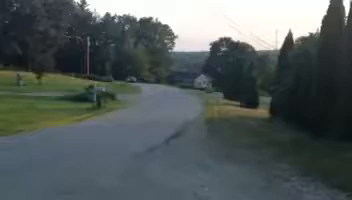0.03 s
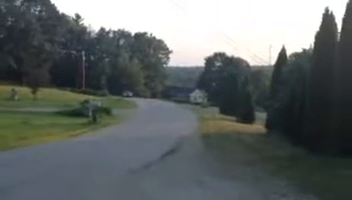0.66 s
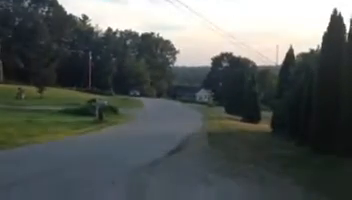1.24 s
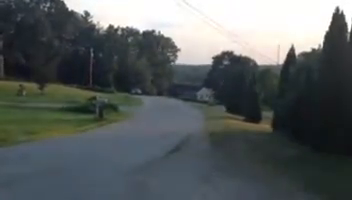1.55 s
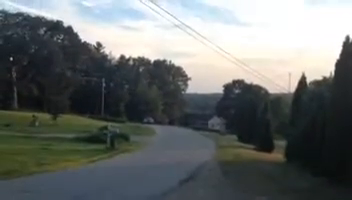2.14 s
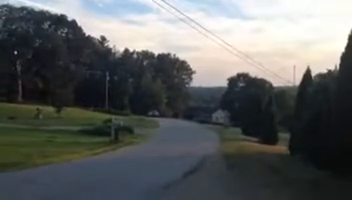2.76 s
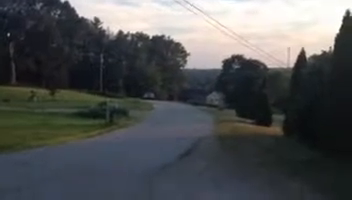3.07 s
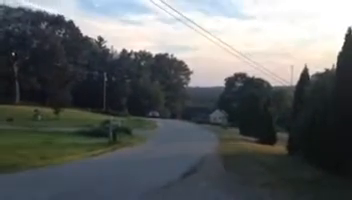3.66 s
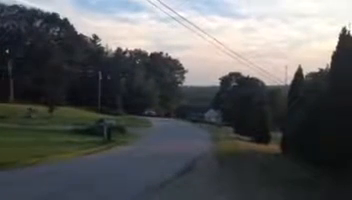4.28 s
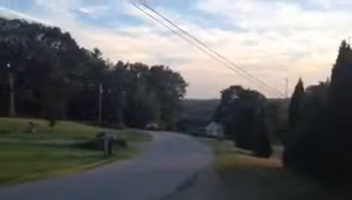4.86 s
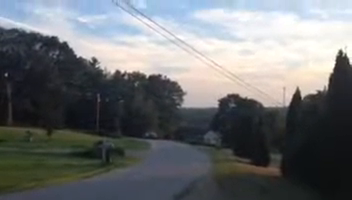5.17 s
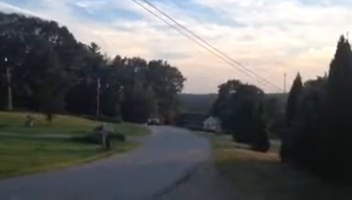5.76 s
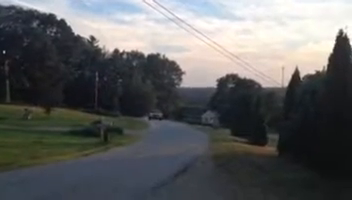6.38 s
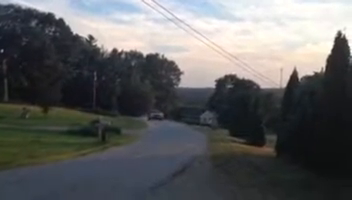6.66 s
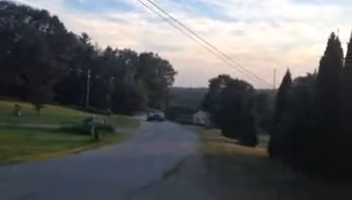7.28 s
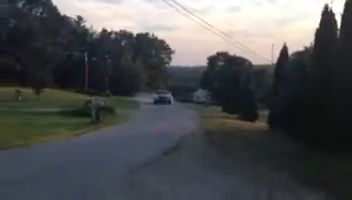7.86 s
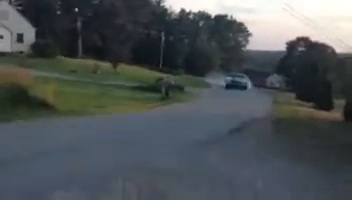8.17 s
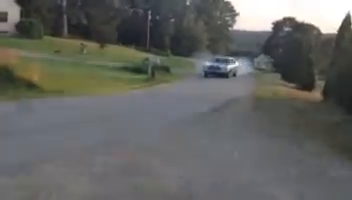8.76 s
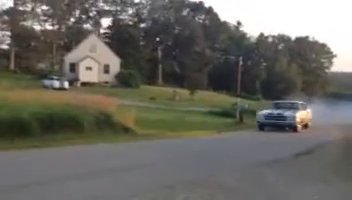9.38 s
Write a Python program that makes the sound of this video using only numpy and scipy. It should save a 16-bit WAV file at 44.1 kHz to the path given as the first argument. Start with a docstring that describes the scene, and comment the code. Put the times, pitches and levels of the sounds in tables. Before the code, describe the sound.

A faint V8 idle on a country road surges into a loud approaching burnout, tyres squealing, then drops to a thumping lope.

```python
"""A V8 lopes at idle far down a country road, in still air with a faint bird and an insect calling.
It blips, then spins its rear tyres in a long burnout towards a hand-held mono microphone, whose case
ticks now and then. Firing pulses ring the pipes into a boom, bark and drone; the slipping rubber roars,
squeals and whines, with a dull echo off the tree line. Close by, unburnt fuel pops as the driver
lifts, the tyres grip and the engine falls back to a thumping lope."""
import sys
import numpy as np
from scipy import signal
from scipy.fft import rfft, irfft, next_fast_len
from scipy.io import wavfile
from scipy.ndimage import uniform_filter1d, map_coordinates

SR = 44100
rng = np.random.default_rng(int(sys.argv[2]) if len(sys.argv) > 2 else 0)


def transcribe(u):
    """Save the signal u as a 16-bit wav file named by the first command-line argument.

    u: samples, shape (n,) or (channels, n), limited to [-1, 1]; the rate is SR.
    q: integer samples, one column per channel.
    """
    v = np.clip(np.atleast_2d(u).T, -1, 1)
    q = np.round(v * 32767).astype(np.int16)
    wavfile.write(sys.argv[1], SR, q)


N = 419832

# Idle, blip, burnout and overrun. Each row: time in seconds, four-stroke cycles a second.
ENGINE_SPEED = [(0, 7.7), (1.5, 8.1), (3, 10.9), (3.4, 11.1), (3.98, 9.7), (4.05, 13), (4.23, 13.5),
                (4.3, 14.6), (4.36, 18.8), (4.57, 13.8), (4.63, 15), (4.7, 19), (4.8, 24.6), (4.92, 25.7),
                (5.1, 30.8), (5.26, 35.4), (5.41, 38.6), (5.54, 37.1), (5.84, 41.8), (6.34, 41.7),
                (6.5, 37.4), (6.7, 33.3), (6.78, 37.2), (6.87, 39), (7.01, 35), (7.39, 41.1), (7.69, 43.9),
                (7.95, 42.8), (8.15, 43.2), (8.4, 41.8), (8.55, 39.2), (8.66, 33.5), (8.8, 25.8),
                (8.96, 21.7), (9.2, 21.7), (9.3, 21.2)]
# The driver's foot on the throttle. Each row: start and end in seconds, opening from 0 to 1.
PEDAL_PRESSES = [(1.9, 3.55, 0.86), (3.985, 4.2, 0.5), (4.22, 4.423, 1), (4.545, 6.434, 0.8),
                 (6.712, 7.67, 0.84), (7.59, 8.86, 0.38)]
# Base levels by engine speed. Each row: cycles a second, then boom, bark, roar and hiss in dB.
LEVELS_BY_SPEED = [(7.75, -54.5, -64, -66.5, -68.5), (10.64, -52, -59, -63, -70.5),
                   (14, -43.5, -45.5, -49.5, -60), (20.7, -35.5, -39, -42.5, -53.5),
                   (29.1, -38.5, -31.5, -36, -51.5), (43.33, -37.5, -36, -28, -37)]
# The cylinders in firing order. Each row: relative pulse strength in dB, lateness in firing intervals.
FIRING_ORDER = [(-7, 0.015), (5.5, 0.067), (-4.5, 0.035), (7, 0.13), (-0.5, 0.15), (1.5, 0.031), (2, 0.15),
                (-3.5, 0.012)]
# The pipes' boom, and their bark from far and near. Each row: frequency in Hz, relative level in dB.
BOOM_SPECTRUM = [(45, -43), (80, -22), (97, -33), (110, -14.5), (130, -4.5), (150, -2.5), (185, -5),
                 (220, 0), (275, -13), (330, -6), (420, -37.5)]
BARK_FAR_SPECTRUM = [(150, -41), (270, -2.5), (325, -2.5), (410, -1.5), (530, 2), (660, 3), (850, -7.5),
                     (1200, -29)]
BARK_NEAR_SPECTRUM = [(150, -41), (280, -13), (330, -21), (420, -12.5), (520, -4.5), (610, 3.5),
                      (760, -4.5), (900, -6), (1200, -35)]
# The roar from the bend and from the open road. Each row: frequency in Hz, relative level in dB.
ROAR_BEND_SPECTRUM = [(500, -29.5), (850, -3.5), (1030, -1.5), (1170, 0), (1470, -8.5), (1800, -4.5),
                      (2060, -7.5), (2400, -4), (2630, -7), (2850, -5.5), (3000, -11.5), (3200, -35),
                      (4160, -45), (7040, -120)]
ROAR_OPEN_SPECTRUM = [(500, -46.5), (850, -7.5), (1050, -2.5), (1170, -2), (1470, -4.5), (1800, -2.5),
                      (2060, -4), (2400, -4), (2630, -6), (2850, -5.5), (3000, -11.5), (3200, -27),
                      (4160, -41), (7040, -120)]
# The hiss far off, in wheelspin and close by. Each row: frequency in Hz, relative level in dB.
HISS_FAR_SPECTRUM = [(1820, -24), (3100, -12), (3820, 1), (4610, 2.5), (5210, -7), (6160, -2.5),
                     (8740, -3.5), (10700, -16), (15500, -31)]
HISS_SPIN_SPECTRUM = [(1820, -32), (3100, -9), (3180, -6), (3820, 0), (4610, 0.5), (5210, -4.5),
                      (6160, -0.5), (7950, -7), (8740, -3), (10700, -12.5), (12800, -13), (14100, -28),
                      (15500, -23)]
HISS_NEAR_SPECTRUM = [(1820, -14), (3100, -16), (3230, -8), (3570, 0), (4200, 1), (5170, -3), (6040, -4),
                      (7390, -10.5), (8920, -3), (12700, -20.5), (13600, -21), (14700, -25), (15500, -24)]
# A close reflection at the microphone. Each row: time in seconds, lag in milliseconds.
REFLECTION_LAG = [(5.2, 1.73), (5.9, 1.69), (7.85, 1.69), (8.15, 1.59), (9.5, 1.58)]
# Still air at the roadside. Each row: frequency in Hz, relative level in dB.
AIR_SPECTRUM = [(25, -37), (53, -26), (99, -9), (129, 5), (331, -25.5), (389, -26), (551, -13.5),
                (871, -20.5), (2420, -29.5), (3250, -35), (4150, -43), (8800, -56), (15500, -41)]
# Distant bird and insect calls. Each row: start and length in seconds, pitch in Hz, level in dB.
WILDLIFE_CALLS = [(1.6, .28, 4430, -65.5), (1.97, .28, 4430, -63), (2.29, .4, 4440, -63.5),
                  (2.36, .22, 4750, -69), (2.25, .32, 13850, -59), (2.53, .32, 13880, -60),
                  (3.04, .22, 13880, -58)]
# Single orders that hum before the burnout. Each row: start and end in seconds, engine order, level in dB.
IDLE_HUMS = [(.1, 1.8, 14, -54), (.47, 1.15, 28, -57.5), (1.75, 3.4, 12, -48.5), (2.53, 3.15, 31, -58.5),
             (2.95, 3.51, 30, -58), (2.88, 3.45, 20, -47)]
# Exhaust tones. Each row: engine order (8 is the firing rate), gain in dB with throttle shut, then open.
ENGINE_ORDERS = [(3, 1, -19), (4, -7, -5), (5, 4, 3), (6, 6, -5), (7, -2, -4), (8, 2, 13.5), (9, 3, 1),
                 (10, -1, 1), (11, 5, 2), (12, 3, 2), (13, -5, -3), (14, -4, -5), (15, -12, -8),
                 (16, 0, -2), (17, -8, -2), (18, -4, -1), (19, -9, -1)]
# Resonances the tones glide through. Each row: frequency in Hz, gain in dB from far, then from near.
PIPE_RESONANCES = [(70, -25, -25), (100, -7, -6), (115, 0, -1), (130, -1, 7), (160, 4, 6), (190, 3, 6),
                   (220, -2, 2), (250, -2, -6), (280, -5, -3), (310, -4, 4), (340, -6, -8), (380, -7, -7),
                   (420, -3, 3), (470, -4, -7), (520, 5, 4), (570, -3, 5), (620, 1, 8), (700, -2, 5),
                   (800, -5, 4)]
# The drone's rise and fall. Each row: time in seconds, base level in dB.
DRONE_LEVEL = [(4.05, -51), (4.2, -53), (4.33, -47.5), (4.45, -56), (4.55, -54), (4.62, -49), (4.74, -40),
               (5.1, -37), (5.4, -41), (5.6, -42), (5.85, -42), (6.3, -40), (6.45, -38), (6.7, -40.5),
               (6.85, -36.5), (7.05, -33.5), (7.3, -31.5), (7.75, -34), (8, -36.5), (8.6, -35.5),
               (8.85, -40), (9, -42), (9.5, -39)]
# Ticks of the microphone's case. Each row: time in seconds, level in dB, band centre in Hz.
CASE_TICKS = [(1.052, -41, 950), (1.357, -42, 1400), (1.358, -46, 5000), (3.04, -39, 1400),
              (4.687, -33, 7500)]
# Short tyre chirps, and one low howl of the exhaust near 515 Hz.
# Each row: start and length in seconds, pitch in Hz, level in dB.
CHIRPS_AND_HOWL = [(4.654, 0.22, 2380, -38), (5.364, 0.063, 1150, -22), (5.84, .065, 1150, -17.5),
                   (5.975, 0.056, 1185, -16.5), (6.054, 0.059, 1170, -19), (6.128, 0.061, 1170, -18.5),
                   (7.135, 0.055, 1168, -14), (7.377, 0.062, 1765, -14.5), (7.627, 0.235, 515, -25),
                   (8.82, 0.085, 759, -23)]
# The long tyre squeal. Each row: time in seconds, pitch in Hz, level in dB.
SQUEAL_PATH = [(4.75, 900, -50), (5, 975, -34), (5.15, 1040, -36), (5.27, 1130, -29.5), (5.4, 1150, -26),
               (5.55, 1105, -29), (5.7, 1170, -28), (5.86, 1150, -25), (6.05, 1190, -25.5),
               (6.35, 1175, -25), (6.55, 1075, -31), (6.68, 1000, -38), (6.8, 1130, -27),
               (7.2, 1150, -22.5), (7.55, 1190, -16.5), (7.85, 1170, -20), (8.1, 1240, -16.5),
               (8.5, 1245, -23.5), (8.8, 1250, -30), (8.95, 1230, -60)]
# Its partials. Each row: multiple of the pitch, gain in dB in the bend, then in the open.
SQUEAL_TONES = [(.5, -17, -13), (1, 0, 0), (1.5, -11, -1.5), (2, -11, -5)]
# The tread's whine. Each row: time in seconds, blocks passing per engine cycle, base level in dB.
TREAD_WHINE = [(4.9, 15.1, -70), (5.1, 15, -35), (5.25, 14.8, -27), (5.45, 14.85, -32), (5.7, 14.6, -41),
               (6.3, 14.5, -41), (6.45, 14.7, -34), (6.7, 14.6, -38), (7, 14.4, -31), (7.3, 14.4, -34),
               (7.7, 14.5, -26), (8.1, 14.45, -26), (8.55, 14.45, -22), (8.7, 14.6, -32), (8.85, 14.6, -70)]
# Exhaust pops as the driver lifts. Each row: time in seconds, peak in dB.
EXHAUST_POPS = [(7.671, -20), (7.719, -19), (7.765, -20), (7.834, -18), (8.803, -14), (8.841, -16.5),
                (8.934, -18), (9.417, -15)]
# The pipes' ring at a thump. Each row: frequency in Hz, relative level in dB, seconds to fall 60 dB.
PIPE_MODES = [(128, 0, .075), (182, 1, .06), (235, -3, .04), (315, -3, .035), (610, -7, .025)]

# what each cause adds to boom, bark, roar and hiss
FULL_THROTTLE_DB = (1.8, 4.1, 1.83, 0.41)
WHEELSPIN_DB = (1.4, 0.55, 4.3, 10.62)
IN_THE_OPEN_DB = (4.8, 7.3, 6.95, 4.12)
BREAK_LOOSE_S, SPIN_UP_S = 4.65, 0.057  # the rear tyres let go
BITE_S, GRIP_S = 6.74, 8.79  # they bite as the throttle reopens, and finally grip
LOPE_FROM_S, LOPE_ON_BEAT_S = 8.96, 9.213  # the closing lope starts; one beat lands on the second time


def amp(db):
    """Decibels to gain."""
    return 10 ** (np.asarray(db) / 20)


def unit(x):
    """Scale to rms 1."""
    return x / np.sqrt(np.mean(x ** 2) + 1e-20)


def clock():
    """The time of every sample in seconds."""
    return np.arange(N) / SR


def noise():
    """Fresh white noise."""
    return rng.standard_normal(N)


def curves(rows):
    """One value per sample for each column after the time."""
    times, *columns = np.transpose(rows)
    return [np.interp(clock(), times, column) for column in columns]


def wobble(rate):
    """A smooth random curve, rate knots a second."""
    return map_coordinates(rng.standard_normal(int(N * rate / SR) + 4), [clock() * rate], order=2)


def ramp(start, length):
    """A straight rise from 0 to 1."""
    return np.clip((clock() - start) / length, 0, 1)


def swell(start, end, edge):
    """A gate with smooth edges of the given length."""
    return np.sin(np.pi / 2 * np.clip(np.minimum(clock() - start, end - clock()) / edge, 0, 1)) ** 2


def colour(x, points):
    """Causal filter through (Hz, dB) points, falling steeply beyond them; the result has rms 1."""
    size = 2 * next_fast_len(N // 2 + 8192)
    hz, db = np.transpose(points)
    log_hz = np.log(np.fft.rfftfreq(size, 1 / SR) + 1)
    beyond = np.maximum(np.log(hz[0]) - log_hz, 0) + np.maximum(log_hz - np.log(hz[-1]), 0)
    gain = amp(np.interp(log_hz, np.log(hz), db) - 60 * beyond)
    cepstrum = irfft(np.log(gain + 1e-6))[:size // 2]
    minimum_phase = np.exp(2 * rfft(cepstrum, size) - cepstrum[0])
    return unit(irfft(rfft(x, size) * minimum_phase)[:N])


def steady(x):
    """Take the slow changes of level out, keeping the throb."""
    return x / np.sqrt(np.abs(uniform_filter1d(x * x, size=SR // 5)) + 1e-9)


def layer_levels(speed, throttle, spin, in_open):
    """Boom, bark, roar and hiss in dB, from engine speed, throttle, wheelspin and the car's place."""
    speeds, *layers = np.transpose(LEVELS_BY_SPEED)
    # roar and hiss hold on briefly when the engine slows
    coasting = np.maximum(speed, np.interp(clock() - 0.097, clock(), speed))
    drives = speed, speed, coasting, coasting
    by_speed = [np.interp(np.log(drive), np.log(speeds), db) for drive, db in zip(drives, layers)]
    effort_db = np.outer(FULL_THROTTLE_DB, throttle) + np.outer(WHEELSPIN_DB, spin)
    return np.array(by_speed) + effort_db + np.outer(IN_THE_OPEN_DB, in_open)


def firings(cycle, scatter_db, jitter, pattern):
    """Eight exhaust pulses a cycle; the two banks differ in strength and pipe length."""
    cylinders = len(FIRING_ORDER)
    index = np.arange(int(cycle[-1] * cylinders))
    db, late = np.array(FIRING_ORDER)[index % cylinders].T
    timing, strength = rng.standard_normal((len(index), 2)).T
    at = np.interp((index + late + jitter * timing) / cylinders, cycle, np.arange(N))
    return np.bincount(at.astype(int), amp(pattern * db + scatter_db * strength), N)


def puffs(cycle, decay_s, depth):
    """Gas leaves in bursts that die away after each firing."""
    pulses = firings(cycle, scatter_db=5.5, jitter=0.077, pattern=0.67)
    bursts = signal.lfilter([1], [1, -np.exp(-1 / (decay_s * SR))], pulses)
    return 1 + depth * steady(bursts)


def exhaust(cycle, near, load, boom_db, bark_db):
    """The pulses boom and bark through the pipes, with turbulence riding on them."""
    # once a cycle two cylinders of one bank fire back to back: the lope
    throb = amp(5.5 * np.cos(np.pi * cycle) ** 4)
    thuds = throb * firings(cycle, scatter_db=3.5, jitter=0.099, pattern=0.23)
    boom = steady(colour(thuds, BOOM_SPECTRUM))
    pulses = steady(firings(cycle, scatter_db=-0.5, jitter=0.092, pattern=0.81))
    flow = pulses + 1.97 * steady(noise() * puffs(cycle, decay_s=0.0079, depth=0.57))
    bark = steady((1 - near) * colour(flow, BARK_FAR_SPECTRUM) + near * colour(flow, BARK_NEAR_SPECTRUM))
    # under load the cylinders fire evenly, so these ragged layers drop
    return amp(boom_db - 10 * load) * boom + amp(bark_db - 2.5 * load) * bark


def reflected(x):
    """A close reflection combs the sound at the microphone; the comb slides up as its lag shrinks."""
    lag_ms, = curves(REFLECTION_LAG)
    return x + 0.3 * np.interp(clock() - lag_ms / 1000, clock(), x)


def roar(cycle, in_open, near, roar_db, hiss_db):
    """Exhaust rasp, faint at idle, then tearing rubber; the colour shifts with wheelspin and distance."""
    rasp = noise() * puffs(cycle, decay_s=0.0021, depth=0.12)
    body = (1 - in_open) * colour(rasp, ROAR_BEND_SPECTRUM) + in_open * colour(rasp, ROAR_OPEN_SPECTRUM)
    body = steady(reflected(body))
    scuff = noise() * puffs(cycle, decay_s=0.003, depth=0.18)
    spun_up = ramp(BREAK_LOOSE_S, 0.98)
    far = (1 - spun_up) * colour(scuff, HISS_FAR_SPECTRUM) + spun_up * colour(scuff, HISS_SPIN_SPECTRUM)
    hiss = steady((1 - near) * far + near * colour(scuff, HISS_NEAR_SPECTRUM))
    # the tyres scrub harder as they bite, and again just before they grip
    bite_db = 3 * ramp(BITE_S, 0.018) * np.exp(-np.abs(clock() - BITE_S) / 0.35)
    grip_db = 3 * (ramp(GRIP_S - .14, .14) - ramp(GRIP_S, .05))
    scrub_db = bite_db + grip_db
    treble_db = 3.5 * near  # close by, the air takes less of the treble
    flutter = wobble(28)
    body *= amp(roar_db + scrub_db / 2 + 0.71 * flutter)
    hiss *= amp(hiss_db + scrub_db + treble_db + 0.68 * flutter)
    return body + hiss


def countryside():
    """Still air, with a bird's faint whistles and an insect's thin buzzes that swell and die away."""
    out = amp(-50) * colour(noise(), AIR_SPECTRUM)
    for start, length, hz, db in WILDLIFE_CALLS:
        phase = 2 * np.pi * np.cumsum(hz + 40 * wobble(300)) / SR
        envelope = swell(start, start + length, length / 4) * amp(-24 * ramp(start + length / 3, length))
        out += amp(db + 1.7 * wobble(25.6)) * envelope * np.sin(phase)
    return out


def tree_echo(x, wet_db, t60):
    """The tree line scatters a dull, late echo back across the road."""
    t = clock()
    scatter = colour(noise(), [(80, -3), (1500, -4), (6000, -8), (15000, -19)])
    tail = scatter * amp(-60 * t / t60) * (1 - np.exp(-t / 0.02))
    tail = tail[:SR] / np.linalg.norm(tail)
    return x + amp(wet_db) * signal.fftconvolve(x, tail)[:N]


def order_tone(cycle, order):
    """One engine order, wandering in phase and strength on its way through the air."""
    phase = 2 * np.pi * (order * cycle + rng.random()) + .7 * wobble(4) + .24 * wobble(14)
    return np.sqrt(2) * np.cos(phase) * amp(wobble(3) + 1.8 * wobble(17))


def drone(cycle, speed, throttle, near):
    """Lone hums at idle, then a stack of orders, balanced by the throttle and lifted by resonances."""
    pipe_hz, far_db, near_db = np.transpose(PIPE_RESONANCES)
    level_db, = curves(DRONE_LEVEL)
    stack = np.zeros(N)
    for order, shut_db, open_db in ENGINE_ORDERS:
        lift = lambda db: np.interp(np.log(order * speed), np.log(pipe_hz), db)
        resonance_db = (1 - near) * lift(far_db) + near * lift(near_db)
        stack += amp(shut_db + (open_db - shut_db) * throttle + resonance_db) * order_tone(cycle, order)
    hums = sum(amp(db) * swell(start, end, 0.17) * order_tone(cycle, order)
               for start, end, order, db in IDLE_HUMS)
    above_idle = np.clip((speed - 11.8) / 2.1, 0, 1)
    return amp(level_db) * above_idle * stack + hums


def handling(bump_s=5.605, bump_hz=58):
    """The microphone's case ticks in the hand and takes one soft bump."""
    strike = lambda start, t60: (clock() >= start) * amp(-60 * np.clip((clock() - start) / t60, 0, 2))
    out = amp(-33) * strike(bump_s, 0.1) * np.sin(2 * np.pi * bump_hz * (clock() - bump_s))
    for start, db, hz in CASE_TICKS:
        case = signal.butter(2, [hz / 1.7, hz * 1.7], "bandpass", fs=SR)
        out += amp(db) * strike(start, 0.011) * unit(signal.lfilter(*case, noise()))
    return out


def squeal(cycle, spin, in_open, cycles_per_turn=3):
    """Each rear tyre screeches in arcs, one a wheel turn; the overtones grow out in the open."""
    hz, level_db = curves(SQUEAL_PATH)
    pair = np.zeros(N)
    for detune, tyre_db in (0, 0), (-.025, -7):
        turn = np.cos(2 * np.pi * cycle / cycles_per_turn + 1.6 * wobble(6))
        shake = .008 * wobble(35) + .023 * (1 + in_open / 3) * wobble(260)
        pitch = hz * (1 + detune + .014 * turn + shake)
        phase = 2 * np.pi * np.cumsum(pitch) / SR
        for multiple, bend_db, open_db in SQUEAL_TONES:
            partial_db = bend_db + (open_db - bend_db) * in_open
            stutter_db = 4.5 * turn + 2.5 * wobble(70)
            pair += amp(tyre_db + partial_db + stutter_db) * np.sin(multiple * phase)
    return amp(level_db) * spin * steady(pair)


def chirps_and_howl():
    """Short tyre chirps and one low exhaust howl: tones whose pitch shakes and whose strength stutters."""
    out = np.zeros(N)
    for start, length, hz, db in CHIRPS_AND_HOWL:
        phase = 2 * np.pi * np.cumsum(hz * (1 + .015 * wobble(30) + .03 * wobble(220))) / SR
        stutter = amp(5.5 * np.tanh(wobble(36)))
        tone = unit(stutter * (np.sin(phase) + 0.18 * np.sin(2 * phase)))
        out += amp(db) * swell(start, start + length, 0.036) * tone
    return out


def break_loose():
    """The tread scuffs over the asphalt as the tyres let go."""
    grit = colour(noise(), [(3400, -18), (4300, 5), (5300, -2), (6800, -1), (9000, -28), (13000, -30)])
    start = BREAK_LOOSE_S + .02
    return amp(-40.5) * swell(start, start + 0.23, 0.13) * grit


def tread(cycle):
    """Spinning tread blocks whine just off the engine's orders, with a weaker tone an octave below."""
    blocks, db = curves(TREAD_WHINE)
    phase = 2 * np.pi * np.cumsum(blocks * np.gradient(cycle) * (1 + .012 * wobble(60)))
    whine = np.sin(phase) + amp(-12) * np.sin(phase / 2)
    return amp(db - 0.5 + 2.9 * wobble(20)) * unit(whine)


def thumps(cycle):
    """Unburnt fuel pops in the pipes; on the overrun one cylinder thumps once in every cycle."""
    beat_count = np.floor(cycle - np.interp(LOPE_ON_BEAT_S, clock(), cycle))
    beats = clock()[1:][np.diff(beat_count) > 0]
    lope = []
    for start in beats[beats > LOPE_FROM_S]:
        peak_db = -19 + 6 * (start - LOPE_FROM_S)  # louder as the car nears
        lope.append((start + rng.normal(0, .0012), peak_db + rng.normal(0, 1.4)))
    t = np.arange(SR // 8) / SR
    ring = sum(amp(db - 60 * t / t60) * np.sin(2 * np.pi * hz * t) for hz, db, t60 in PIPE_MODES)
    ring = signal.sosfilt(signal.butter(6, 112, "highpass", fs=SR, output="sos"), ring)
    blows = np.zeros(N)
    for start, db in EXHAUST_POPS + lope:
        blows[min(int(start * SR), N - 1)] = amp(db)
    return signal.fftconvolve(blows, ring / np.abs(ring).max())[:N]


def scene():
    """The crankshaft drives every exhaust layer; one roadside microphone feeds both channels."""
    speed, = curves(ENGINE_SPEED)
    cycle = np.cumsum(speed) / SR
    throttle = sum(opening * swell(start, end, edge=0.1) for start, end, opening in PEDAL_PRESSES)
    spin = ramp(BREAK_LOOSE_S, SPIN_UP_S)
    in_open = ramp(6.51, 0.73)  # the car rolls out of the bend
    near = ramp(7.74, 0.48)  # and comes up to the microphone
    boom_db, bark_db, roar_db, hiss_db = layer_levels(speed, throttle, spin, in_open)
    car = exhaust(cycle, near, throttle * spin, boom_db, bark_db)
    car += drone(cycle, speed, throttle, near) + thumps(cycle)
    car += roar(cycle, in_open, near, roar_db, hiss_db)
    car += squeal(cycle, spin, in_open) + chirps_and_howl() + tread(cycle) + break_loose()
    car = tree_echo(car, wet_db=-16.5, t60=0.26)
    return np.tile(car + countryside() + handling(), (2, 1))


def record(dry):
    """The microphone opens after a moment, saturates at full scale and passes nothing above 15.6 kHz."""
    live = np.clip(dry * swell(.113, 11, .01), -1, 1)
    return irfft(rfft(live) * (np.fft.rfftfreq(N, 1 / SR) < 15600), N)


dry = scene()
out = record(dry)
transcribe(out)
```